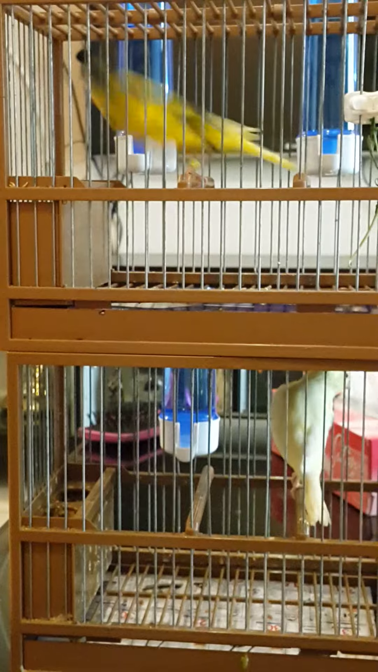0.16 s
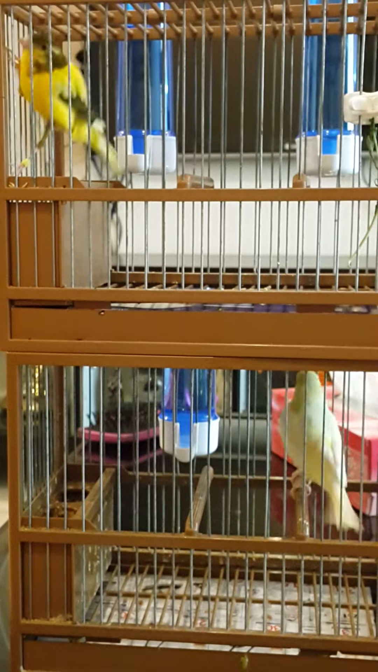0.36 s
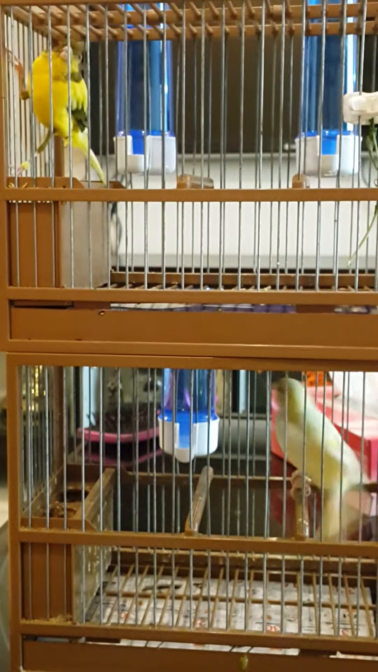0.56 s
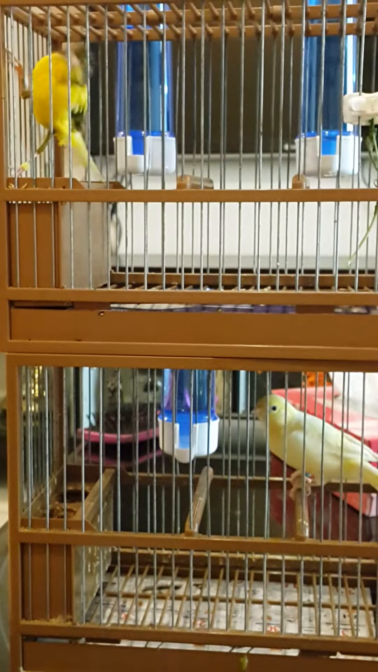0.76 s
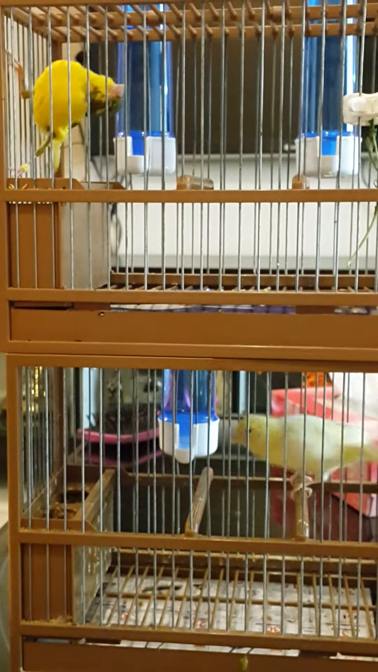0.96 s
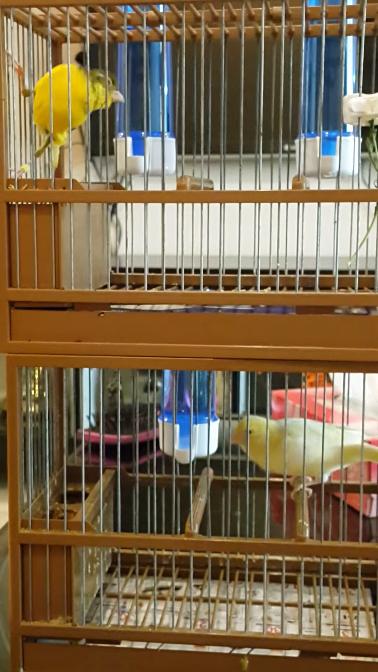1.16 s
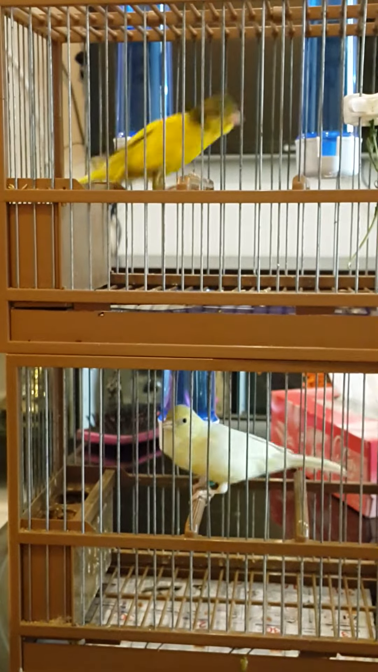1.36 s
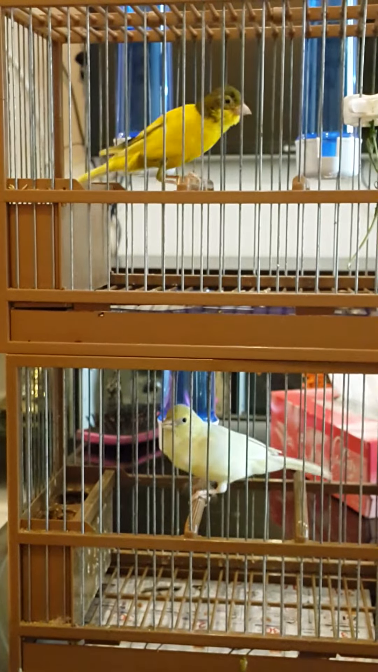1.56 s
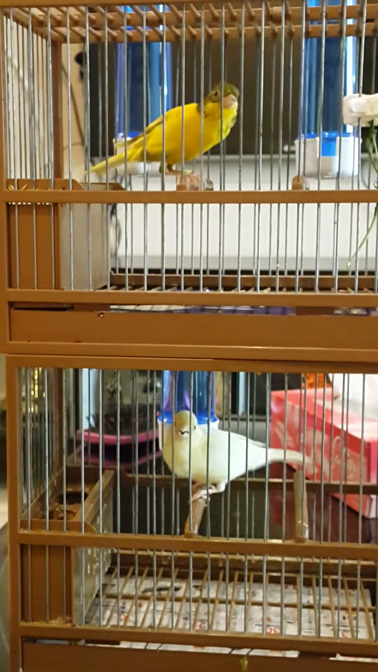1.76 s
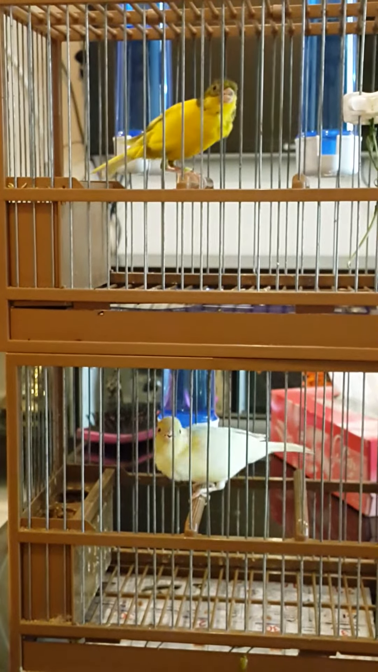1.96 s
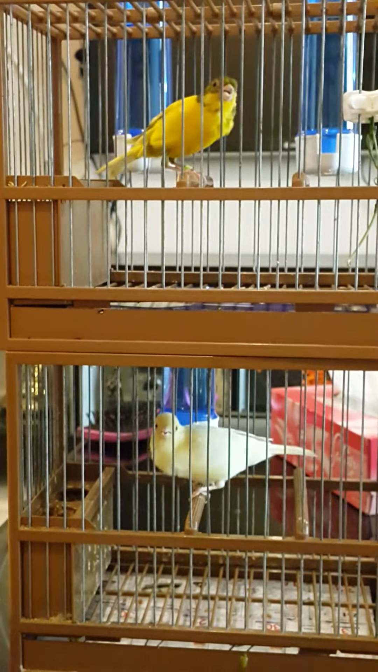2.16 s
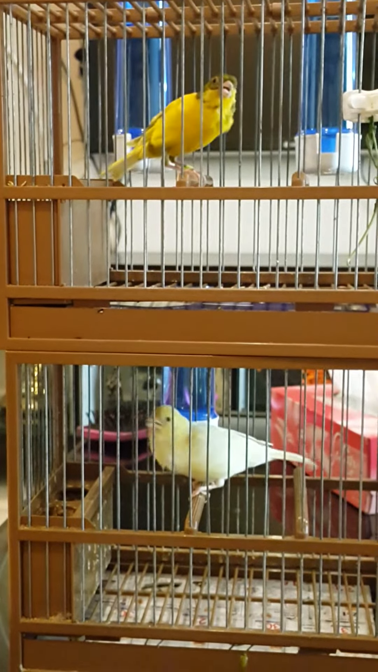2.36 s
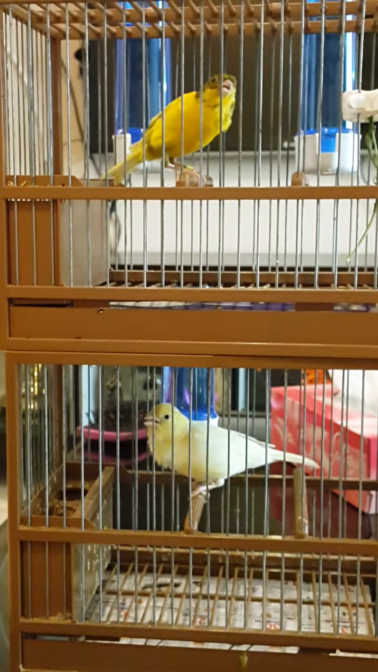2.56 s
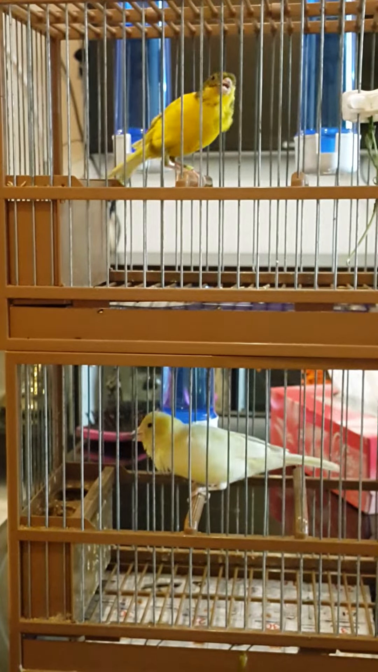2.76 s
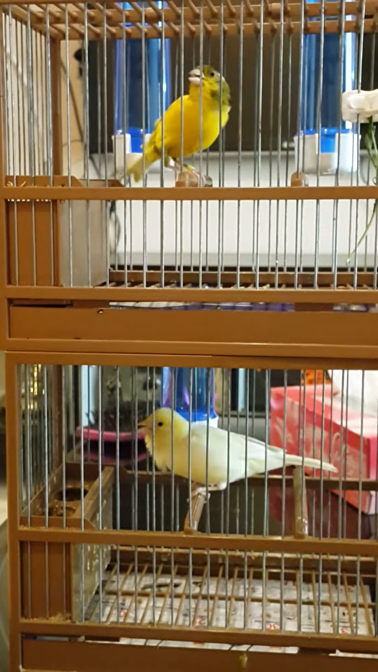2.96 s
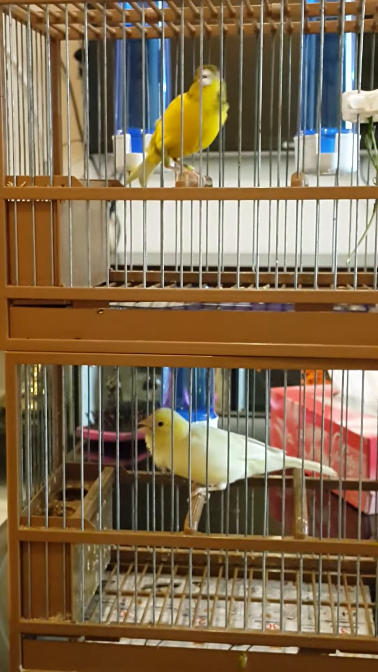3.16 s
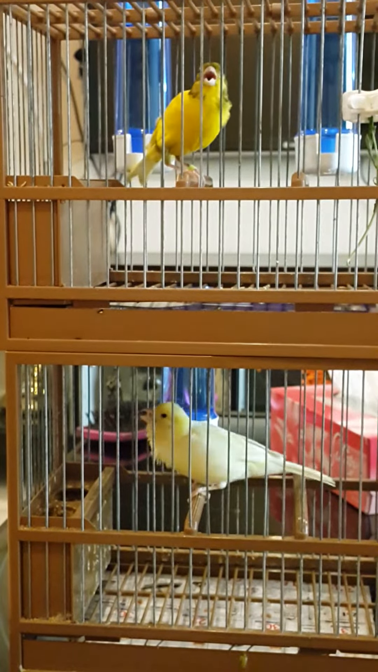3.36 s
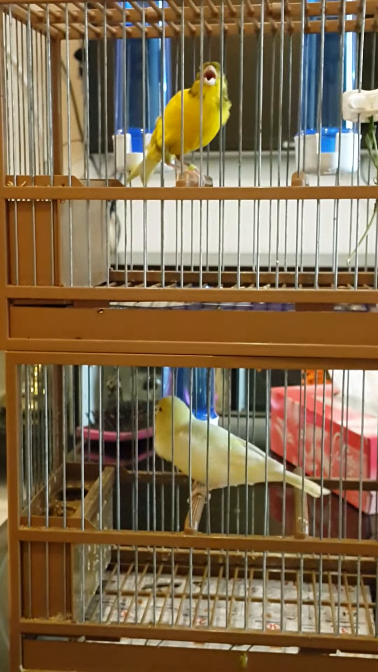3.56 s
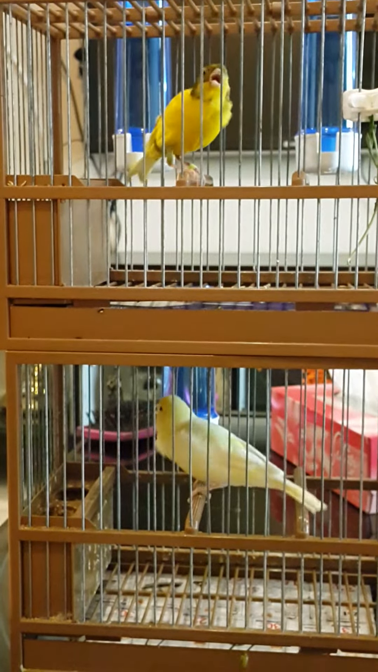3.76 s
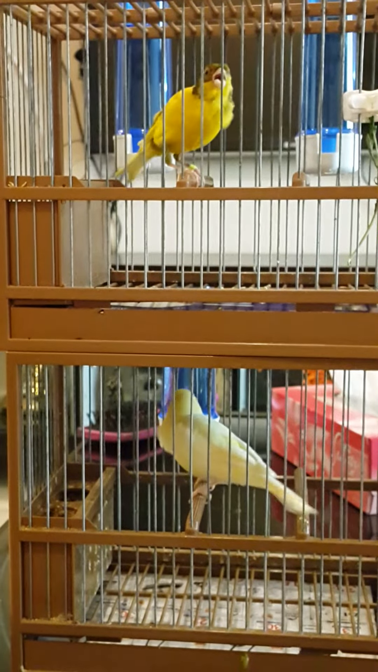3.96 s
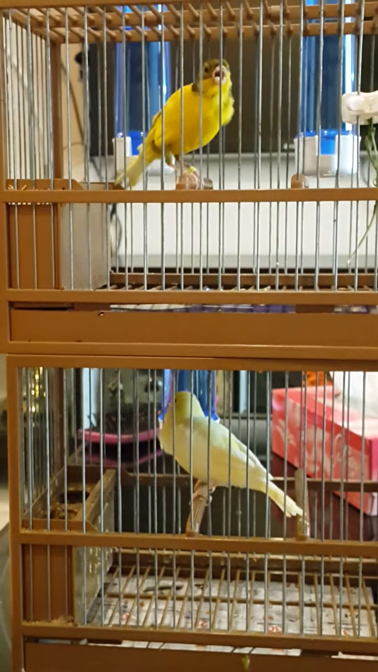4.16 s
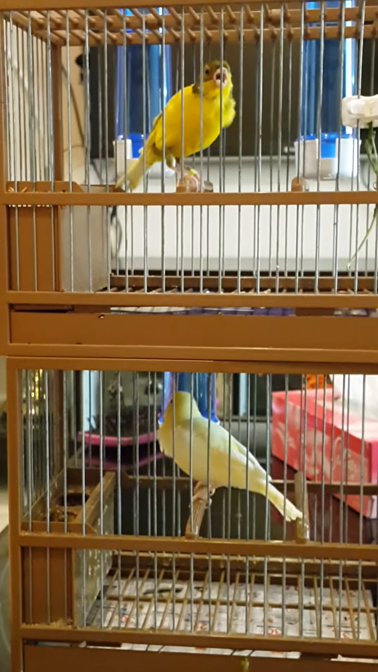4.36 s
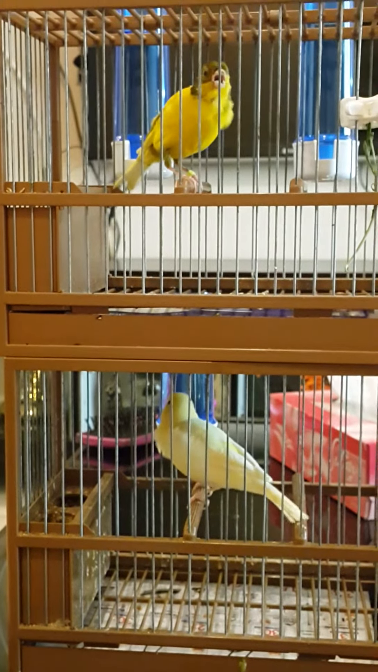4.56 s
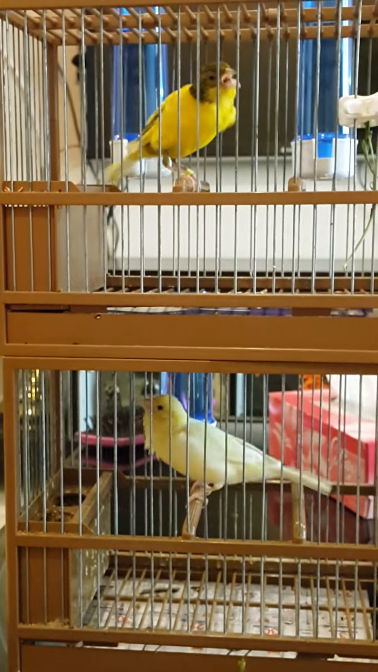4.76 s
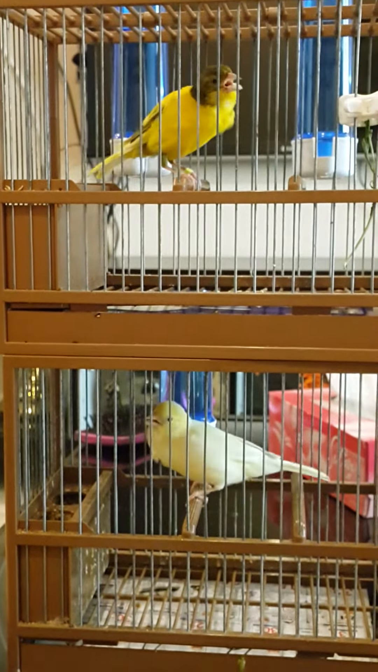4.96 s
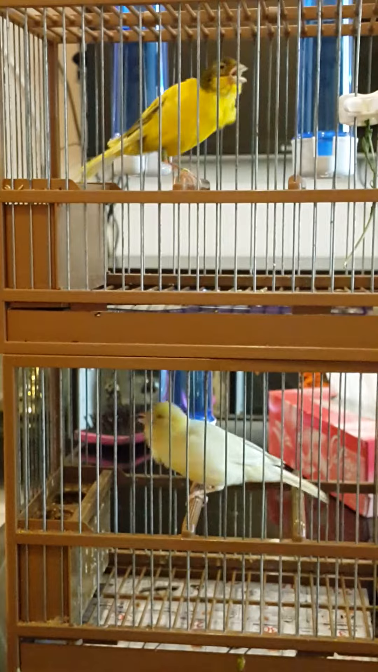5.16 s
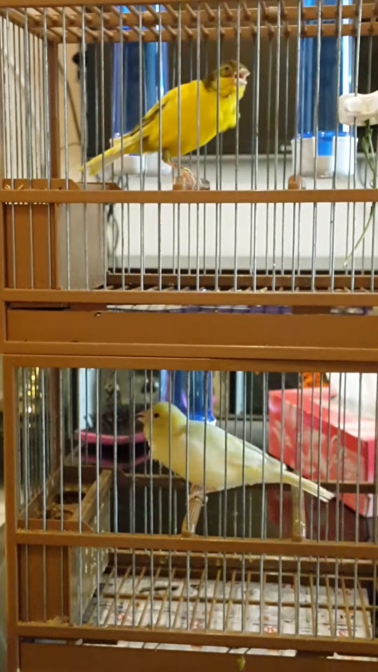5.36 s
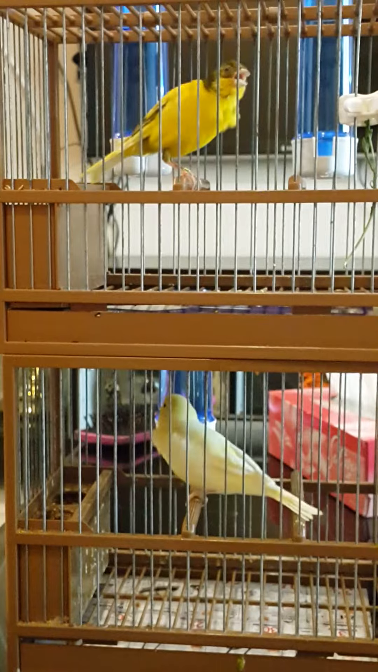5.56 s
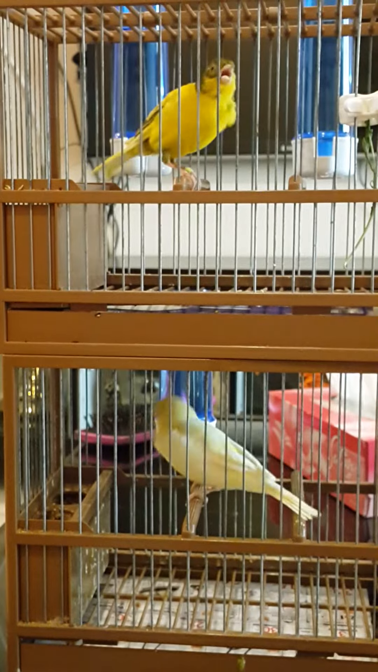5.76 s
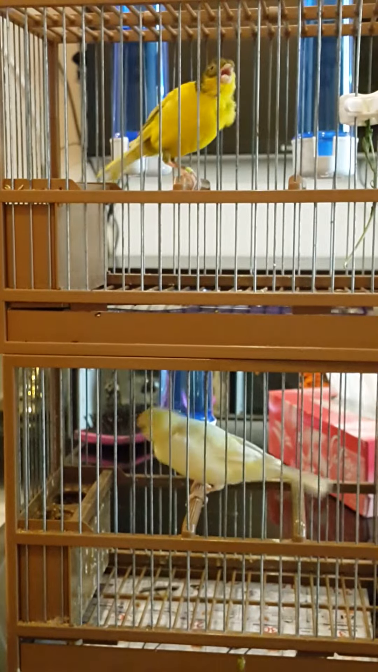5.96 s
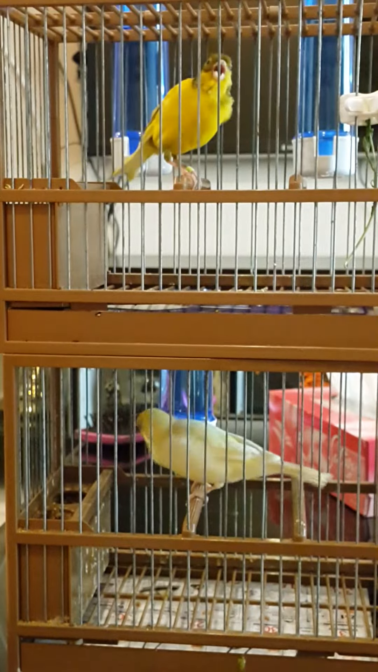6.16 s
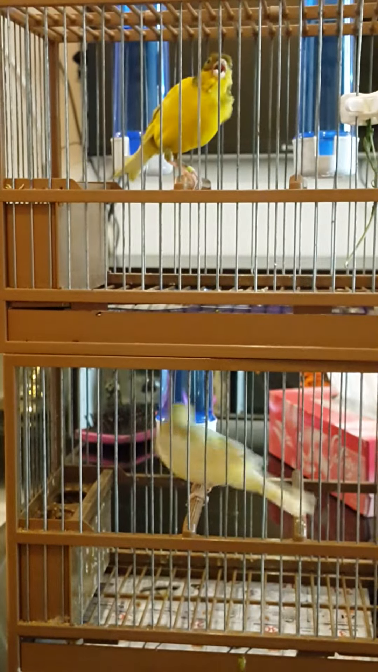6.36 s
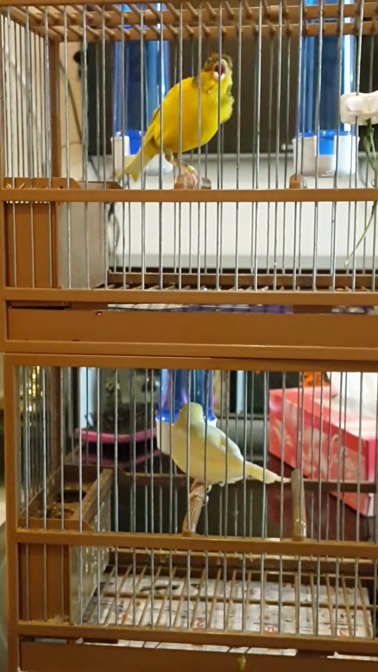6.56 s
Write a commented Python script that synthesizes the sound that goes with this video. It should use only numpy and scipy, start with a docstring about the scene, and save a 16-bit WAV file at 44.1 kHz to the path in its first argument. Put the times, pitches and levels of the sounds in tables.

```python
"""Caged canaries singing in a small room

Short hoarse chirps and long gliding whistles overlap above a low, steady rush, with light taps on the cage.
A two-note roll gives way to a louder, faster one that sinks in pitch at the end; a quick trill of upward
flicks crosses it. Each voice is a trembling near-sine with two overtones, placed in an echoing room;
the taps and the rush are shaped noise."""
import sys
import numpy as np
from scipy import signal
from scipy.fft import rfft, irfft
from scipy.io import wavfile
from scipy.ndimage import uniform_filter1d, map_coordinates

SR = 44100
rng = np.random.default_rng(int(sys.argv[2]) if len(sys.argv) > 2 else 0)


def wav_record(signal):
    """Record a signal, one row per channel, as 16-bit PCM in the file named by sys.argv[1]."""
    frames = np.transpose(np.atleast_2d(signal))
    bounded = np.clip(frames, -1, 1)
    # unit amplitude maps onto the largest positive 16-bit level
    quanta = np.round(bounded * 32767).astype(np.int16)
    wavfile.write(sys.argv[1], SR, quanta)


N = 295029
TIME = np.arange(N) / SR
TREBLE_HZ = 7200  # above this the room dies away sooner and the left side hears less
RIGHT_LAG_S, HIGH_LAG_S = .000318, .000272  # lateness of the right side: most sounds, upper notes of the rolls

# Gesture of the lower note in both rolls: time after the start [t/s], pitch ratio [1], relative level [level/dB]
LOW_SHAPE = [(0, 1.01, -19), (.007, 1.007, -2), (.02, .999, -1), (.034, .997, 2), (.041, 1.004, -1),
             (.048, 1.012, -24)]


def from_db(db):
    """Convert decibels to amplitude gain."""
    return 10 ** (np.asarray(db) / 20)


def rms_one(x):
    """Scale to unit power, taken over all channels together."""
    return x / np.sqrt(np.mean(x ** 2) + 1e-20)


def at_hz(points, hz):
    """Read a curve of (frequency, value) points on a log-frequency axis."""
    f, value = np.transpose(points)
    return np.interp(np.log(hz + 1), np.log(f), value)


def waver(size, rate_hz):
    """Draw a smooth random curve of spread about 1, through rate_hz random points per second."""
    knots = rng.standard_normal(int(size * rate_hz / SR) + 6)
    position = 2 + np.arange(size) * rate_hz / SR
    return map_coordinates(knots, [position], order=3, mode="nearest")


def coloured(spectrum, size):
    """Shape two unrelated noises to a spectrum, at unit power."""
    white = rfft(rng.standard_normal((2, size)))
    gain = from_db(at_hz(spectrum, np.fft.rfftfreq(size, 1 / SR)))
    return rms_one(irfft(white * gain, size))


def add(out, start_s, sound):
    """Mix a sound in at its time."""
    i = max(0, int(start_s * SR))
    out[:, i:i + sound.shape[-1]] += sound[..., :max(0, N - i)]


def panned(x, pan_db):
    """Share a sound between left and right at constant power; positive leans left."""
    gains = from_db([[pan_db / 2], [-pan_db / 2]])
    return rms_one(gains) * x


def syrinx(hz, db, second_db, third_db, rough, rough_hz):
    """Sing a near-sine with two overtones; the membrane trembles in pitch and strength."""
    size = len(hz)
    edge_s = .004  # the quickest start or stop of a voice
    tremble = rough * waver(size, rough_hz) + 0.0028 * waver(size, 59.43)
    phase = 2 * np.pi * np.cumsum(hz * (1 + tremble)) / SR

    beak_db = 3 * waver(size, 90)  # the moving beak lets out more or less of the overtones
    second = from_db(second_db) * np.sin(2 * phase)
    third_fits = 3 * hz.mean() < SR / 2.2  # leave the third harmonic out near the top of the band
    third = from_db(third_db) * np.sin(3 * phase) * third_fits
    tone = np.sin(phase) + from_db(beak_db) * (second + third)

    i = np.arange(size)
    edge = np.clip(np.minimum(i, i[::-1]) / (edge_s * SR), 0, 1)
    loudness = from_db(db + 2.0 * waver(size, 220)) * np.sin(edge * np.pi / 2) ** 2
    return np.sqrt(2) * loudness * tone


def syllable(shape, hz, db):
    """Draw the pitch and level of one note, with the corners of its gesture rounded."""
    s, ratio, level = np.transpose(shape)
    t = np.arange(int(s[-1] * SR)) / SR
    curves = (hz * ratio, db + level)
    return [uniform_filter1d(np.interp(t, s, c), size=130, mode="nearest") for c in curves]


def notes(rows, shape, gain_db, third_db):
    """Sing clear notes that repeat one gesture; gain_db trims the row levels."""
    out = np.zeros((2, N))
    for s, hz, db, pan_db, second_db in rows:
        pitch, level_db = syllable(shape, hz, db + gain_db)
        voice = syrinx(pitch, level_db, second_db, third_db, rough=.003, rough_hz=453)
        add(out, s, panned(voice, pan_db))
    return out


def trill(drift, count, start_s, period_s, slowing_s):
    """Lay out one voice of a trill: evenly slowing beats, each note sung as the drift stands at that moment."""
    scatter, scatter_db = .0015, .5  # chance from note to note: share of the pitch, level
    k = np.arange(count)
    s = start_s + period_s * k + slowing_s * k ** 2 / 2  # slowing_s lengthens the period on every cycle
    at, *columns = np.transpose(drift)
    hz, db, pan_db, second_db = [np.interp(s, at, c) for c in columns]
    chance = rng.standard_normal((count, 2))
    hz = hz * (1 + scatter * chance[:, 0])
    db = db + scatter_db * chance[:, 1]
    return np.transpose([s, hz, db, pan_db, second_db])


def room(x, lag_s, early_db, late_db, early_t60):
    """Add a quick scatter from cage and nearby walls and the tail of the room; the treble dies first."""
    room_t60, treble_share = 0.43, 0.79  # decay by 60 dB in s; the treble takes this share of each decay time
    t = TIME[:SR * 3 // 4]
    response = np.zeros((2, len(t)))
    is_treble = np.fft.rfftfreq(len(t), 1 / SR) > TREBLE_HZ
    for db, t60 in ((early_db, early_t60), (late_db, room_t60)):
        noise = rng.standard_normal((2, len(t)))
        treble = irfft(rfft(noise) * is_treble, len(t))
        body_tail = (noise - treble) * from_db(-60 * t / t60)
        treble_tail = treble * from_db(-60 * t / (t60 * treble_share))
        onset = np.clip(20 * t / t60, 0, 1)
        # unit energy per side, so db is relative to the direct sound
        response += from_db(db) * rms_one((body_tail + treble_tail) * onset) / np.sqrt(len(t))
    response[0, 0] += 1  # direct sound, left then right
    response[1, round(lag_s * SR)] += 1
    return signal.fftconvolve(x, response, axes=1)[:, :N]


def beamed(x):
    """Favour the right side in the treble, as overtones leave the beak in a narrower beam."""
    is_treble = np.fft.rfftfreq(N, 1 / SR) > TREBLE_HZ
    left_db, right_db = -4.5, 0
    return irfft(rfft(x) * from_db(is_treble * np.array([[left_db], [right_db]])), N)


def rush():
    """Steady room noise, mixed from a middle and a side part so that both sides are alike in the bass."""
    # Colour of the rush: frequency [f/Hz], relative density [level/dB per Hz]
    colour = [(20, -23.5), (36, -21), (50, -5), (85, -0.5), (180, -6.5), (270, -1), (450, -14), (950, -12),
              (1700, -21), (3000, -27.5), (5500, -36.5), (7700, -36), (9500, -37), (16000, -36)]
    # Likeness of the two sides: frequency [f/Hz], left-right correlation [1]
    likeness = [(50, 1), (120, 0.95), (300, 0.86), (700, 0.28), (1400, -0.17), (2800, 0.11), (8000, -0.11)]
    part_db = -53  # level of middle and side parts; their sum is 3 dB higher on each side
    mid, side = rfft(coloured(colour, N))
    alike = np.clip(at_hz(likeness, np.fft.rfftfreq(N, 1 / SR)), -.99, .99)
    stereo = np.sqrt(1 + alike) * mid + np.sqrt(1 - alike) * side * [[1], [-1]]
    return from_db(part_db) * irfft(stereo, N)


def taps(ring_t60, rattle_t60, gain_db):
    """Feet and beaks knock one part of the cage and rattle the bars: two decaying noises per tap."""
    # Taps: time [t/s], level before the trim [level/dB], main ring [f/Hz], rattle against ring [level/dB]
    tap_rows = [(0.386, -54.5, 3710, 14.5), (1.457, -61.5, 1760, 14), (2.649, -71, 3920, 10),
                (3.054, -66, 3170, -10.5), (3.611, -51, 1820, -35), (4.218, -39.5, 3090, -24.5)]
    # Colour of the rattling bars: frequency [f/Hz], relative density [level/dB per Hz]
    rattle_colour = [(1000, -10.5), (1800, -5), (2600, -7.5), (3600, -10), (5500, -6), (7500, -2.5),
                     (10000, -6), (15000, -10.5)]
    out, t = np.zeros((2, N)), TIME[:SR // 4]
    for s, db, hz, rattle_db in tap_rows:
        ring_colour = [(hz / 2, -42), (hz * .88, -12), (hz, 0), (hz * 1.15, -10), (hz * 2, -40)]
        ring = coloured(ring_colour, len(t)) * from_db(-60 * t / ring_t60)
        rattle = coloured(rattle_colour, len(t)) * from_db(rattle_db - 60 * t / rattle_t60)
        add(out, s, from_db(db + gain_db) * (ring + rattle))
    return out


def rising_peep():
    """One soft note whose pitch climbs as it fades."""
    # Note: time [t/s], pitch [f/Hz], level before the trim, left-right, second harmonic [level/dB]
    peep_row = [(1.122, 4070, -44.5, -4, -16)]
    # Gesture: time after the start [t/s], pitch ratio [1], relative level [level/dB]
    shape = [(0, 0.94, -15), (0.013, .98, 0), (0.026, 1.03, 5.5), (.042, 1.2, -40)]
    return notes(peep_row, shape, gain_db=0.5, third_db=-31)


def chirps(gain_db, third_db):
    """Each chirp scoops up with a rasp and clears; the harder it is pushed, the more it rasps and falls."""
    # Chirps: time [t/s], pitch [f/Hz], level before trim and throat, second harmonic before the throat [level/dB]
    chirp_rows = [(0.055, 5010, -47.5, -5.5), (0.187, 5000, -50, -8.5), (0.318, 5070, -45.5, -8),
                  (0.635, 5105, -44.5, -7.5), (0.741, 5060, -41, -9.5), (0.847, 5113, -44.5, -2),
                  (0.967, 5020, -45, -7.5), (1.119, 5060, -51.5, 0.5), (1.629, 4994, -36.5, -12),
                  (1.732, 5058, -34.5, -16), (1.896, 4930, -38.5, -10.5), (2.35, 4950, -32.5, -14.5),
                  (2.492, 4930, -31.5, -16.5), (2.681, 5000, -36, -6.5), (2.805, 5060, -30.5, -24),
                  (2.926, 5060, -32.5, -14), (3.173, 4970, -32.5, -18), (3.341, 4825, -30.5, -17.5),
                  (3.522, 4983, -29, -21), (4.128, 4897, -28.5, -20.5), (4.29, 4770, -32.5, -15),
                  (4.632, 4852, -30, -27), (4.757, 4916, -29, -28), (4.902, 4870, -30.5, -25),
                  (5.267, 4876, -31, -16.5), (5.384, 4940, -32.5, -17), (5.545, 5080, -32, -18),
                  (5.727, 5102, -31.5, -18), (5.882, 5010, -30.5, -27), (6.142, 5120, -30.5, -13.5),
                  (6.307, 5100, -30.5, -13.5)]
    # Gesture: time after the start [t/s], pitch ratio [1], relative level [level/dB]
    shape = [(0, .87, -27), (.008, .955, -11), (.016, 1.01, -2), (.03, 1.0, 1.5), (.05, .99, 0),
             (.072, .992, -9), (.095, .996, -24)]
    # What the throat and beak let through: frequency [f/Hz], gain [level/dB]
    throat = [(3800, -8.5), (4300, 7), (4750, -2), (5400, 3.5), (6500, -15.5), (8500, -5), (9700, -2),
              (10500, 0.5), (13300, -16), (14800, 0.5), (16000, -10.5)]
    soft_db, loud_db = -45, -30  # row levels that mean no effort and full effort
    fall_per_s, middle_s = .9, .04  # fall at full effort, as a share of the pitch; time of passing the pitch
    full_rasp, soft_share, rasp_decay_s = .021, .7, .08  # pitch tremble at full effort; share left at none
    out = np.zeros((2, N))
    for s, hz, db, second_db in chirp_rows:
        pitch, level_db = syllable(shape, hz, db + gain_db)
        t = TIME[:len(pitch)]
        effort = np.interp(db, [soft_db, loud_db], [0, 1])
        pitch = pitch * (1 - effort * fall_per_s * (t - middle_s))
        rasp = full_rasp * (soft_share + (1 - soft_share) * effort) * np.exp(-t / rasp_decay_s)
        add(out, s, syrinx(pitch, level_db, second_db, third_db, rasp, rough_hz=784))
    throat_gain = from_db(at_hz(throat, np.fft.rfftfreq(N, 1 / SR)))
    return panned(irfft(rfft(out) * throat_gain, N), pan_db=1.0)


def whistles(gain_db, third_db):
    """Long thin notes glide, then level off; they fade in and out, change in level, and flutter or droop."""
    # Whistles: time, length [t/s], first pitch, pitch it tends to [f/Hz], glide time [t/s],
    # level before the trim, swell over its length [level/dB], closing droop, flutter [share of pitch],
    # left-right, second harmonic [level/dB]
    whistle_rows = [(1.203, .57, 5680, 5180, 0.081, -38, 4, 0, 0.0058, -4.5, -20.5),
                    (1.867, 0.49, 5800, 5250, .17, -29.5, 6.5, 0.0029, 0.0033, -2, -29),
                    (1.855, 0.45, 6820, 5950, .12, -32.5, -4, 0.096, 0.0015, -4.5, -25.5),
                    (2.319, 0.39, 5227, 5300, 0.208, -28, -7, 0, 0.0069, -4, -27),
                    (2.791, .48, 6300, 5880, 0.19, -31.5, 7, 0, 0.0114, -7, -15),
                    (3.35, 0.344, 7200, 7912, .18, -23, 12.5, 0, 0.0085, -6, -35)]
    attack_s, release_s, fade_db = .045, .035, 13
    glide_power = 1.4  # above 1 the pitch lingers before it glides
    droop_s, flutter_hz = .022, 62
    wander, wander_hz = .003, 22  # slow unsteadiness: share of the pitch, rate
    out = np.zeros((2, N))
    for (s, length_s, first_hz, rest_hz, glide_s, db, swell_db,
         droop, flutter, pan_db, second_db) in whistle_rows:
        t = TIME[:int(length_s * SR)]
        hz = rest_hz + (first_hz - rest_hz) * np.exp(-(t / glide_s) ** glide_power)
        closing = droop * np.exp((t - length_s) / droop_s)
        hz = hz * (1 - closing + flutter * np.sin(2 * np.pi * flutter_hz * t))
        hz = hz * (1 + wander * waver(len(t), wander_hz))
        opening = np.minimum(1, np.minimum(t / attack_s, (length_s - t) / release_s))
        level_db = db + gain_db + swell_db * (t / length_s - .5) - fade_db * (1 - opening)
        voice = syrinx(hz, level_db, second_db, third_db, rough=.004, rough_hz=470)
        add(out, s, panned(voice, pan_db))
    return out


def quick_flicks():
    """A quick trill alternates upper and lower notes that all flick upward in pitch."""
    # Drift of each voice: time [t/s], pitch [f/Hz], level before the trim, left-right, second harmonic [level/dB]
    upper_drift = [(4.6, 6650, -40, -25, -34), (4.8, 7050, -33, -19.5, -28.5), (5.06, 6750, -26, -17, -35),
                   (5.26, 6980, -36.5, -8, -31), (5.45, 6600, -31, -10.5, -25)]
    lower_drift = [(4.63, 5537, -18.5, -9, -22.5), (5.0, 5590, -18, -8.5, -24.5),
                   (5.39, 5593, -18.5, -5, -19.5)]
    # Gesture: time after the start [t/s], pitch ratio [1], relative level [level/dB]
    shape = [(0, .97, -22), (.007, .987, 1), (.015, 1.005, 3), (.023, 1.018, -4), (.03, 1.025, -20)]
    upper = trill(upper_drift, count=10, start_s=4.596, period_s=.0907, slowing_s=.0009)
    lower = trill(lower_drift, count=9, start_s=4.596 + .038, period_s=.0907, slowing_s=.0009)
    return notes([*upper, *lower], shape, gain_db=-0.5, third_db=-35)


def first_roll():
    """The first roll alternates a sagging upper note and a lower one; returns the two voices."""
    # Drift of each voice: time [t/s], pitch [f/Hz], level before the trim, left-right, second harmonic [level/dB]
    upper_drift = [(2.41, 6110, -24, 1, -31), (2.55, 6160, -25, 2, -21), (2.7, 6157, -22.5, -3, -21),
                   (3.139, 6142, -22, 0, -18.5), (3.439, 6140, -27, -4.5, -10.5),
                   (3.6, 5987, -19.5, -13, -32), (3.9, 6020, -22.5, -13.5, -18.5),
                   (4.05, 5990, -14, 2.5, -22), (4.21, 5936, -14, 2, -22)]
    lower_drift = [(2.48, 5290, -33, -7, -19.5), (2.63, 5356, -25, -5.5, -17),
                   (2.92, 5288, -21, -0.5, -23.5), (3.22, 5290, -23.5, 1.5, -19),
                   (3.37, 5290, -30.5, -4, -12), (3.67, 5174, -24, -0.5, -24.5), (4.28, 5205, -19, -8, -28)]
    # Gesture of the upper note: time after the start [t/s], pitch ratio [1], relative level [level/dB]
    sag_shape = [(0, .99, -20), (.008, 1.004, -4), (.018, 1.005, 0), (.036, .996, 1), (.046, .992, -3),
                 (.055, .992, -22)]
    upper = trill(upper_drift, count=13, start_s=2.406, period_s=.1454, slowing_s=.00078)
    lower = trill(lower_drift, count=13, start_s=2.406 + .075, period_s=.1454, slowing_s=.00078)
    return (notes(upper, sag_shape, gain_db=0.5, third_db=-33),
            notes(lower, LOW_SHAPE, gain_db=0.5, third_db=-29.5))


def loud_roll():
    """A single lower note leads into the louder, faster two-note roll; returns the two voices."""
    # Drift of each voice: time [t/s], pitch [f/Hz], level before the trim, left-right, second harmonic [level/dB]
    upper_drift = [(3.83, 6110, -25.5, 2, -16), (4.09, 6147, -15.5, -4.5, -26),
                   (4.34, 6176, -16.5, -3.5, -17), (4.87, 6324, -20.5, -2, -18.5),
                   (5.27, 6292, -21.5, -3, -14.5), (5.68, 6430, -21, -5.5, -10),
                   (5.81, 6176, -14.5, -2.5, -12.5), (5.95, 6053, -13, -1, -15),
                   (6.23, 6150, -10, -4, -15.5), (6.36, 6070, -9.5, -0.5, -20),
                   (6.64, 6085, -11, -3.5, -12.5)]
    lower_drift = [(3.89, 5348, -18, -7, -33), (4.53, 5365, -14.5, -9, -30), (4.93, 5343, -15, -8, -32),
                   (5.34, 5323, -15.5, -8.5, -35.5), (5.61, 5320, -15, -6.5, -35),
                   (5.74, 5295, -16.5, -5, -39.5), (5.88, 5200, -20.5, -5, -30), (6.29, 5200, -20, -5, -31),
                   (6.56, 5180, -17.5, -8, -34)]
    # Leading note: time [t/s], pitch [f/Hz], level before the trim, left-right, second harmonic [level/dB]
    lead_in = [(3.785, 5430, -21.5, -3, -18)]
    # Gesture of the upper note: time after the start [t/s], pitch ratio [1], relative level [level/dB]
    high_shape = [(0, .978, -20), (.008, .993, -4), (.018, 1.001, 0), (.036, 1.003, 1), (.044, .998, -3),
                  (.054, .992, -24)]
    upper = trill(upper_drift, count=22, start_s=3.826, period_s=.1289, slowing_s=.00048)
    lower = trill(lower_drift, count=21, start_s=3.826 + .0605, period_s=.1289, slowing_s=.00048)
    return (notes(upper, high_shape, gain_db=-2, third_db=-54.5),
            notes([*lead_in, *lower], LOW_SHAPE, gain_db=0.5, third_db=-28.5))


def scene():
    """Place the rolls and flicks close, the whistles and peep deeper, the chirps and taps deepest in the room."""
    background = rush()
    cage = taps(ring_t60=0.08, rattle_t60=0.032, gain_db=-1.0)
    calls = chirps(gain_db=3.5, third_db=-21.0)
    glides = whistles(gain_db=-2.5, third_db=-46)
    first_high, first_low = first_roll()
    loud_high, loud_low = loud_roll()

    far = room(calls + cage, RIGHT_LAG_S, early_db=-3.5, late_db=-7, early_t60=0.065)
    middle = room(glides + rising_peep(), RIGHT_LAG_S, early_db=-6.5, late_db=-11, early_t60=0.14)
    close_low = first_low + loud_low + quick_flicks()
    lower = room(close_low, RIGHT_LAG_S, early_db=-10, late_db=-10, early_t60=.1)
    upper = room(first_high + loud_high, HIGH_LAG_S, early_db=-10.5, late_db=-9.5, early_t60=.12)
    return background + beamed(far + middle + lower + upper)


def record(dry):
    """Cut the top steeply above 15.9 kHz with an elliptic low-pass."""
    low_pass = signal.ellip(12, .1, 90, 15900, fs=SR, output="sos")
    return signal.sosfilt(low_pass, dry)


dry = scene()
out = record(dry)
wav_record(out)
```